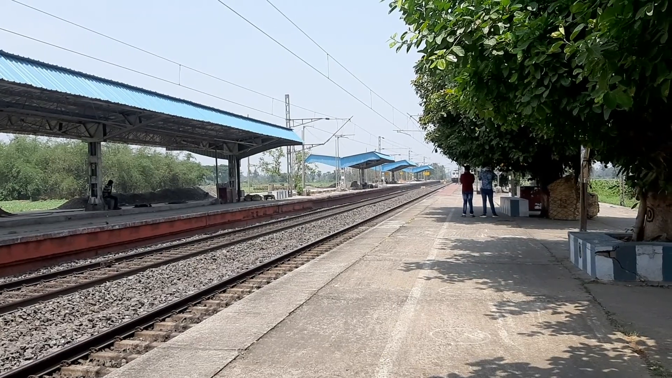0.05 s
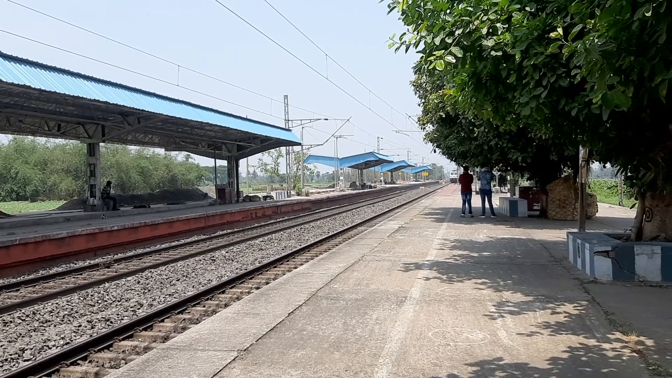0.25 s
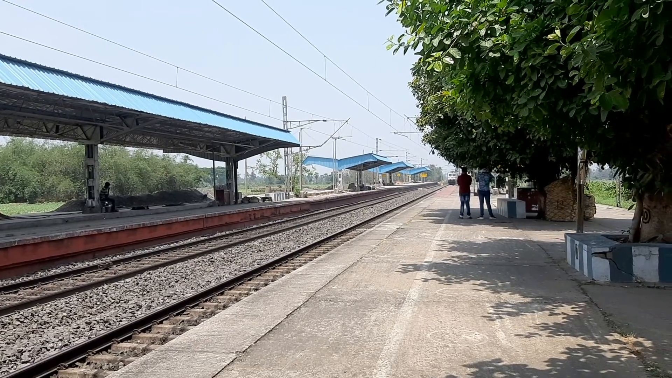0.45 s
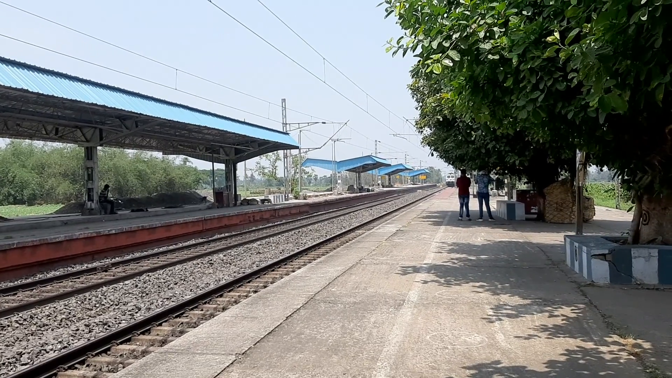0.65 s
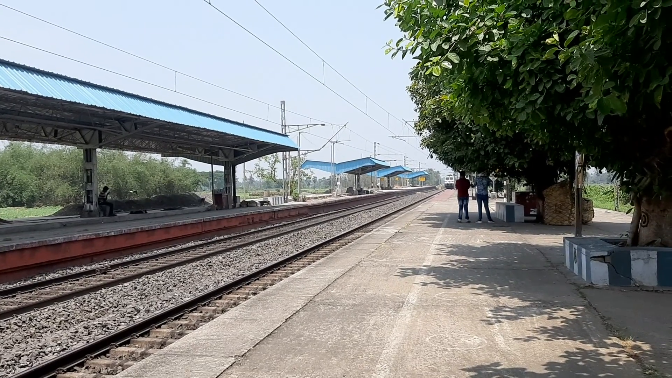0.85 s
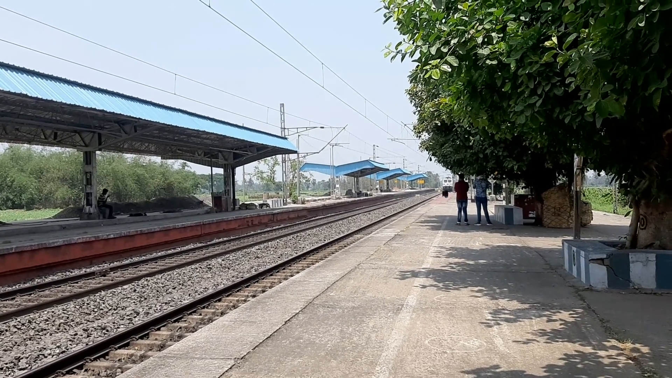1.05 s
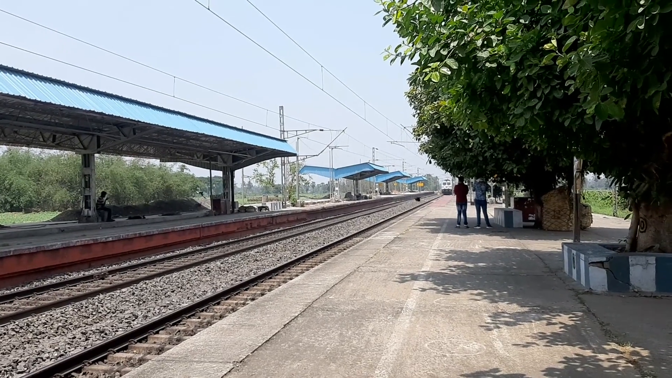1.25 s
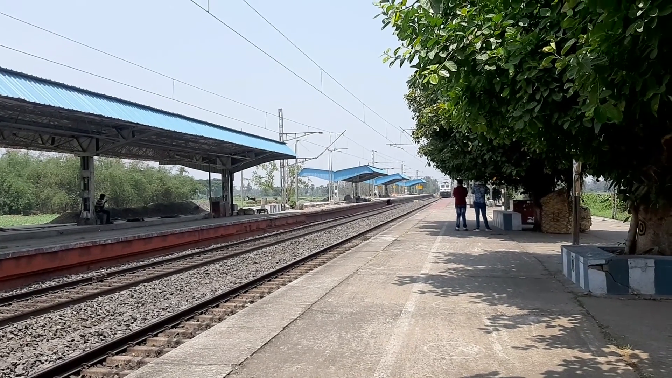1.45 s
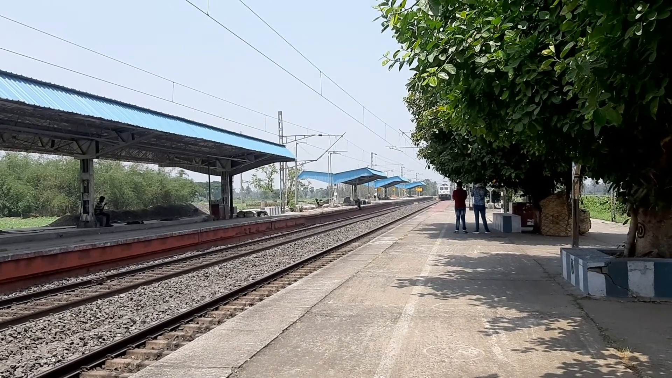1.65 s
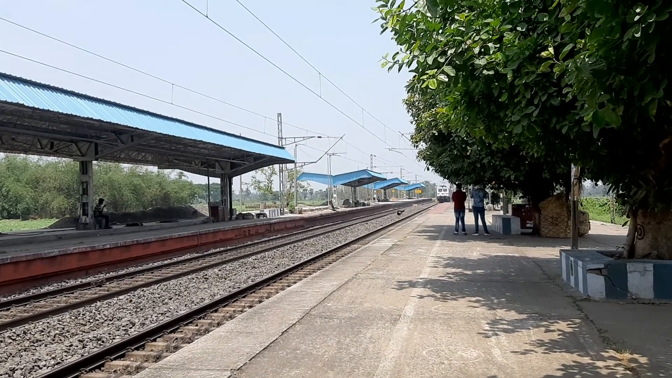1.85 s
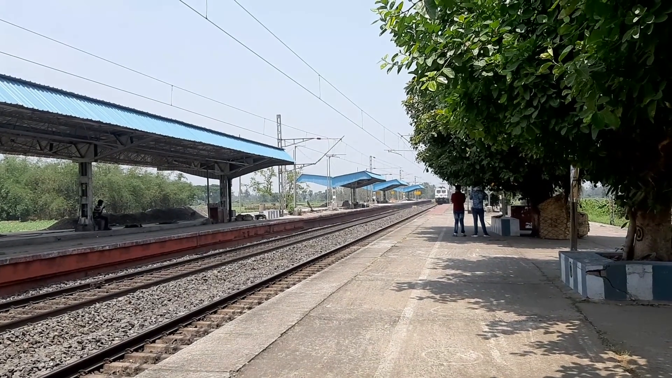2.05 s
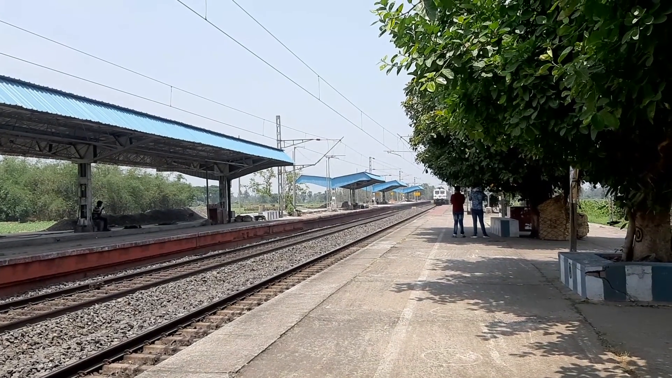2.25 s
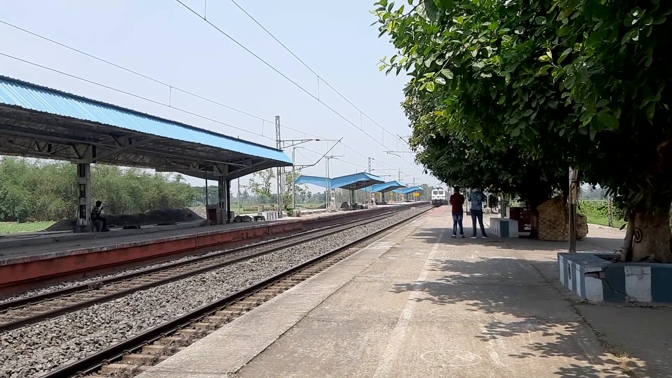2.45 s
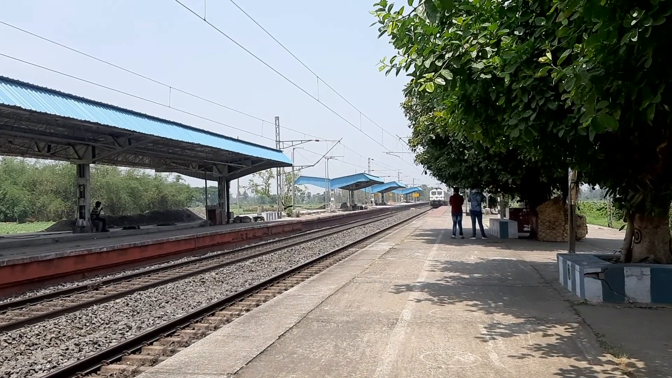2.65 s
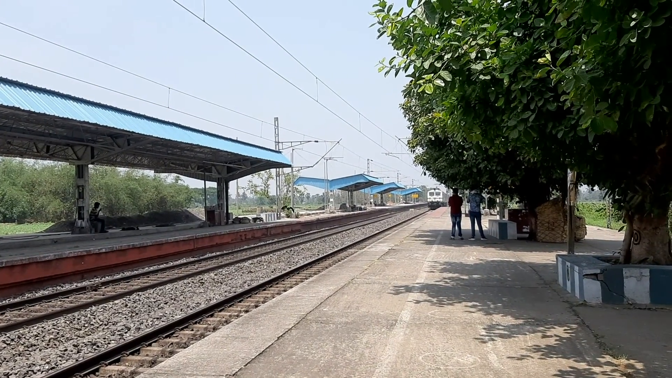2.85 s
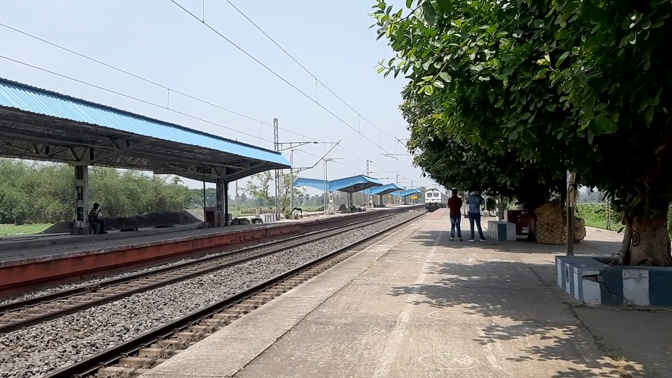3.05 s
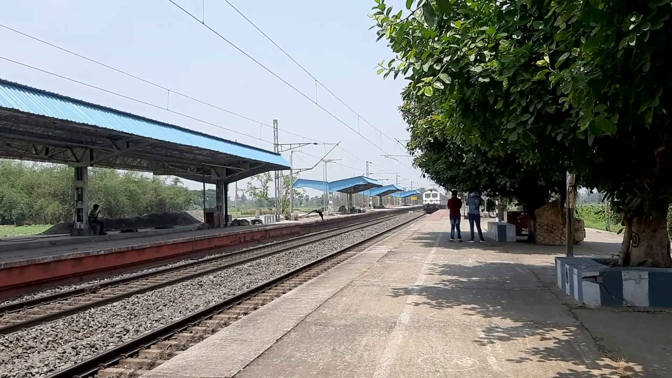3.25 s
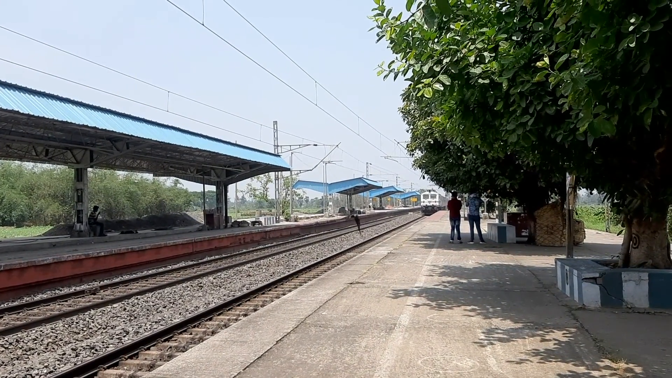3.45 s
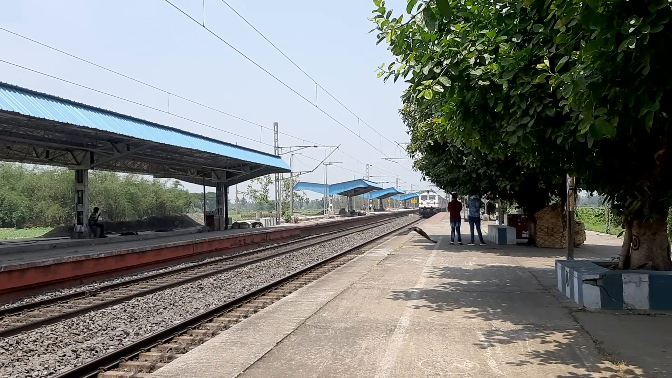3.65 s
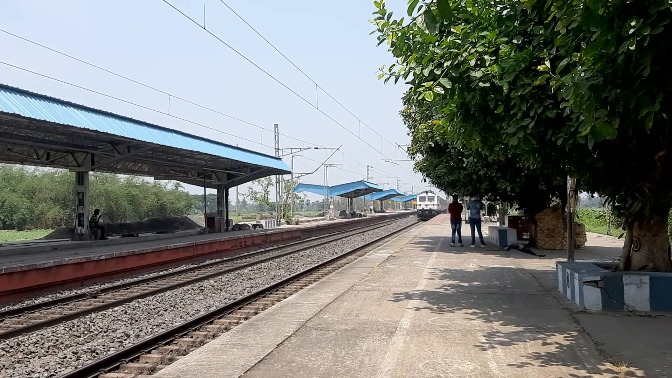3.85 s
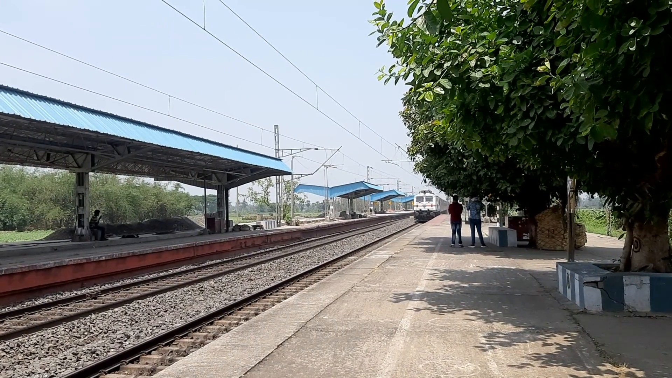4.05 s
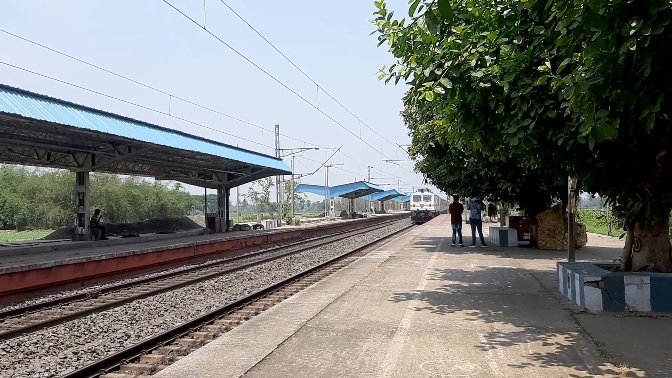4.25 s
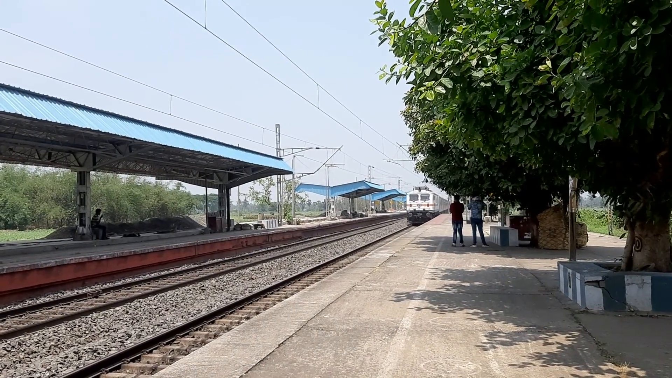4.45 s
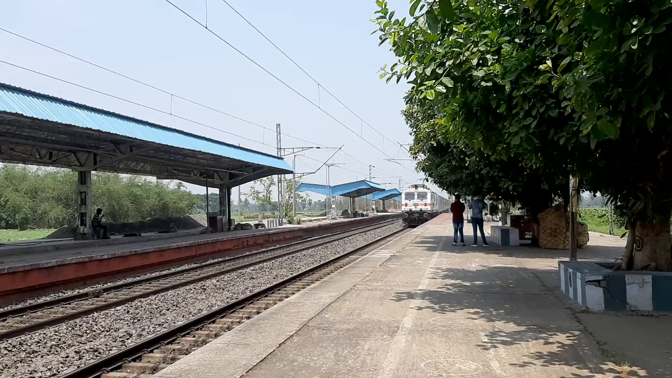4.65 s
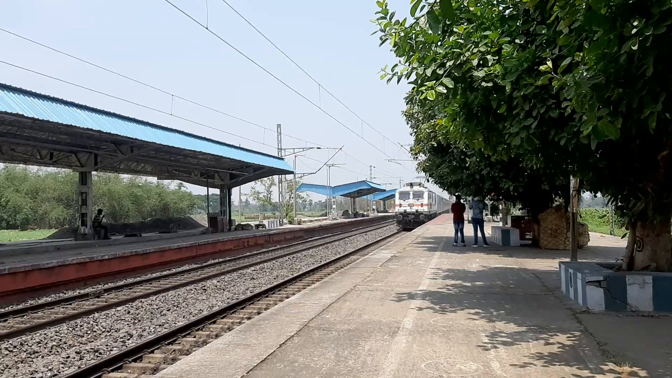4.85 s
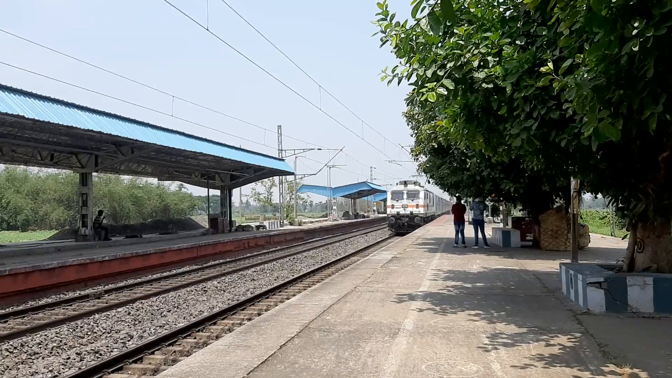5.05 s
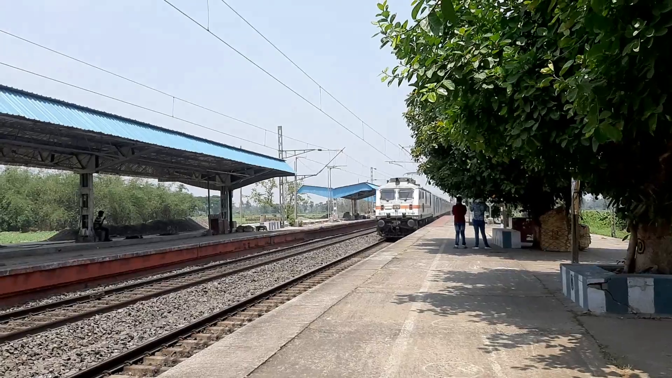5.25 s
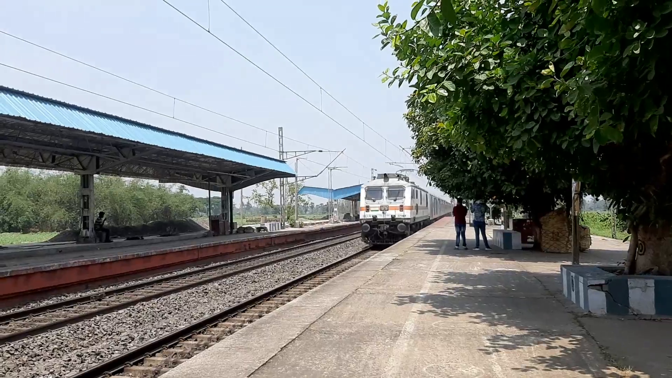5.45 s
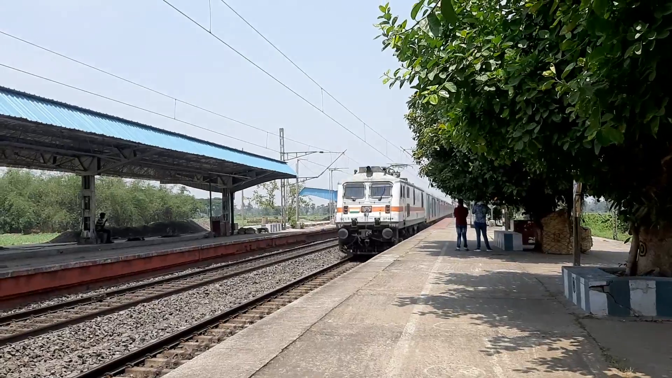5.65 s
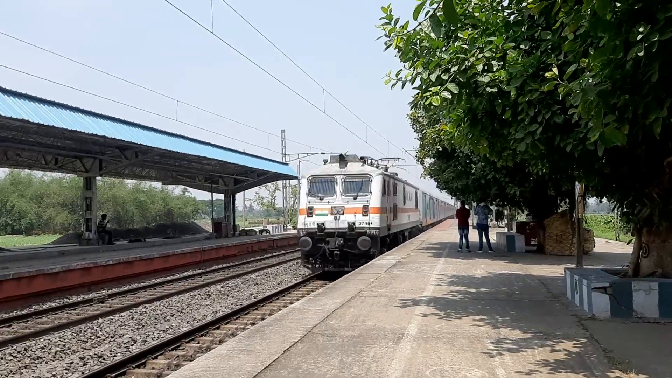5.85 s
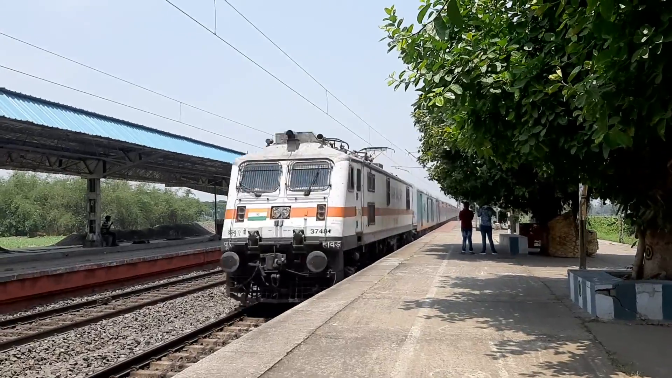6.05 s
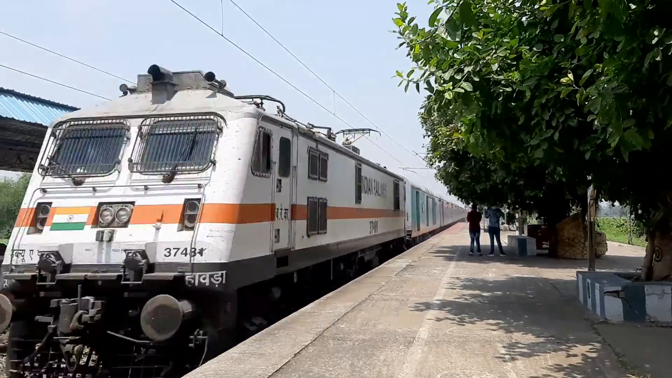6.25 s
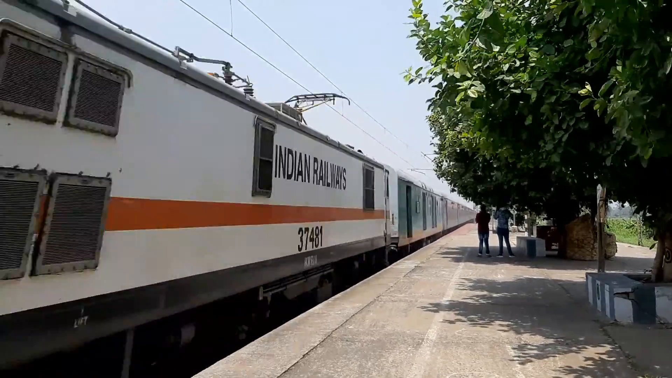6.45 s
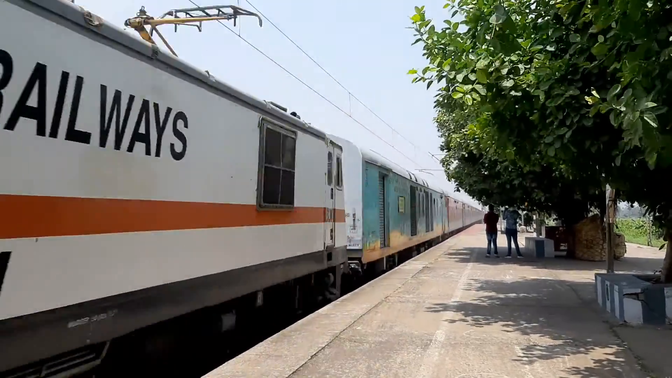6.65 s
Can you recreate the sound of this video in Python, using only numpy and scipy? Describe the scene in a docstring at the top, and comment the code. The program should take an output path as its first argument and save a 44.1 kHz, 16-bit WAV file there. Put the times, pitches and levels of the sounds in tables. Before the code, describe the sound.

An open-air country platform, stereo microphone close to the track. From 0 to about 0.75 s a far locomotive horn, already sounding, wavers softly at a pitch near 355 Hz with strong brassy overtones. It lets go; a hazy echo tail, faint breeze, thin high chirps and a few tiny dry clicks around 1.15 s fill the pause. At 1.35 s a second, louder blast begins, fading and shimmering irregularly, with a brief dip in the surrounding noise near 2.8 s, and ends around 3.8 s. Echoes ring away, with faint chirps near 4.7 s. At 4.8 s the third blast bursts in, bright, raspy and growing very loud. Wheel roar and rumble swell from about 5.5 s, jolting unevenly. Around 6.4 to 6.7 s the engine sweeps past, the horn sliding sharply down in pitch and losing brightness, with brief motor whines amid the roar; it cuts off still sounding.

```python
"""One air horn on an express locomotive sounds three blasts, the first already under way, as it nears a country
platform. Its harmonics interfere over many air paths, so the tone fades and swells; Doppler shift lowers the pitch
as the engine sweeps past. Masts throw back delayed, lower-pitched echoes, and the station answers with a tail.
Comb-filtered noise adds grain round the harmonics; filtered noise makes wheel roar, rumble and breeze;
narrow-band swells make motor whines and faint chirps, and noise bursts a few clicks in the first pause."""
import sys
import numpy as np
from scipy import signal
from scipy.fft import rfft, irfft, next_fast_len
from scipy.io import wavfile
from scipy.ndimage import uniform_filter1d, minimum_filter1d, map_coordinates

SR = 44100
rng = np.random.default_rng(int(sys.argv[2]) if len(sys.argv) > 2 else 0)


def unload_wav(signal):
    """Save mono or channel-first audio to the path in sys.argv[1] as 16-bit WAV at rate SR, clipped to [-1, 1]."""
    wavfile.write(
        sys.argv[1],
        SR,
        np.round(np.clip(np.atleast_2d(signal).T, -1, 1) * 32767).astype(np.int16),
    )


N = 295911

# the horn's blasts, from valve opening to half shut again, with the strength of their side paths before
# distance and pitch alter it: opens_s, half_shut_s, slow_fading_db, fast_shimmer_db
BLASTS = [(-.5, .755, 3.5, -5), (1.35, 3.775, -1, -8), (4.795, 7.5, 0, -7)]
SOUND_SPEED = 343  # m/s
HORN_HZ = 321.38  # at full pressure, standing still
# train speed (m/s), the moment it draws level (s) and the horn's distance then (m)
SPEED, PASSING, TRACK_M = 33, 6.605, 4.2


def horn(dispersion=.085, low_fading=0.2, low_shimmer=0.33, shimmer_rate=45, trim_db=0.84, size=64):
    """Harmonic synthesis and multipath interference: each harmonic fades on its own way through the air."""
    # the low partials, each shaded by the ground in its own way; per blast: time_s, first_db, second_db, third_db
    tone = [
        [(0.03, -32, -34.5, -28), (0.22, -29.5, -37, -23.5), (0.478, -31.5, -30, -43.5), (0.6, -36, -30, -36)],
        [(1.44, -34.5, -26.5, -19.5), (1.55, -38.5, -24, -16), (1.87, -31, -32.5, -16), (1.92, -30, -25.5, -19),
         (2.23, -31.5, -19.5, -15), (2.58, -30, -22.5, -17.5), (2.77, -31, -28.5, -27),
         (2.98, -29.5, -20.5, -18), (3.17, -28, -21.5, -18.5), (3.52, -26.5, -17, -31),
         (3.72, -24.5, -19.5, -24.5)],
        [(4.86, -12, -9.5, -14.5), (4.954, -19, -17.5, -16), (5.072, -19.5, -19, -20),
         (5.276, -21, -20.5, -18.5), (5.302, -19, -19, -31), (5.354, -20, -24.5, -14.5),
         (5.424, -21.5, -17.5, -42), (5.532, -19.5, -24, -20), (5.572, -20.5, -22, -30),
         (5.828, -21, -28.5, -13), (6.146, -23, -12.5, -17.5), (6.28, -21.5, -15.5, -13),
         (6.31, -22, -38, -6.5), (6.366, -8, -7.5, -16), (6.42, -10.5, -11.5, -10)],
    ]
    # the overtones; per blast: time_s, body_db, blare_db, bite_db, sizzle_db
    brass = [
        [(0.03, -33.5, -25.5, -32.5, -52.5), (0.386, -27.5, -33, -35, -64), (0.448, -27, -23.5, -30, -64),
         (0.58, -33, -35, -38, -66)],
        [(1.46, -31.5, -31, -31.5, -45.5), (1.83, -21, -16.5, -31, -46), (2.1, -27, -14, -29, -42.5),
         (2.37, -20.5, -21, -21.5, -44.5), (2.6, -25.5, -14.5, -28, -47.5), (2.73, -28.5, -18.5, -18.5, -34.5),
         (2.95, -25, -15, -21.5, -38.5), (3.15, -21, -23.5, -30, -45), (3.62, -25.5, -23.5, -26.5, -46.5)],
        [(4.92, -28, -16.5, -24, -34.5), (5.184, -19, -14, -22, -32.5), (5.28, -15.5, -17, -21, -35),
         (6.004, -21.5, -18, -22, -28), (6.062, -14, -14, -22, -30), (6.212, -18, -19, -20, -28.5),
         (6.31, -14, -20, -34, -32), (6.38, -11, -16, -41, -32)],
    ]
    # harmonics that share a level curve lie between these counts: harmonic_count
    registers = [0, 1, 2, 3, 7, 12, 22, 44]
    # the horn's own spectrum: multiple, level_db
    overtones = [(1, -11), (2, -4), (3, 0), (4, -10.5), (5, -6), (6, -10), (7, -11), (8, -3), (9, -3.7),
                 (10, -8), (11, -8.5), (12, -9), (13, -14), (14, -11), (15, -13.5), (16, -15.5), (17, -9),
                 (18, -16), (19, -13.5), (20, -11), (21, -20), (22, -29), (25, -26), (27, -28), (30, -21),
                 (33, -23), (38, -24), (44, -26)]
    # how unlike the side paths are in the two channels: frequency_hz, unlikeness
    apart = [(350, .22), (700, .14), (1000, .25), (3000, .47), (7000, .85), (12000, 1.2)]
    absorption = .08  # dB a metre at 10 kHz
    fade_rate, near_fade_rate = 8, 12.07  # fades a second: far away, and added at 10 m
    wake_m = 41  # turbulence round the train adds shimmer within this distance
    lead_s, swing_s = 3.5e-5, 6e-4  # right channel's lead far off, and how much it loses once alongside

    t = clock()
    slow = t[::size]
    distance, angle = approach(slow)
    cycle = np.exp(2j * np.pi * np.cumsum(horn_pitch(t)) / SR).astype(np.complex64)
    fade, shimmer = (amp(per_blast(db, slow)) for db in np.transpose(BLASTS)[2:])
    shimmer = shimmer * np.hypot(1, wake_m / distance)
    # fading quickens near by, where the angles change faster
    progress = np.cumsum(fade_rate + near_fade_rate * 10 / distance) * size / SR
    lead = lead_s - swing_s * np.sin(np.minimum(angle, np.pi / 2)) ** 2
    level_db = per_blast([curves(low, slow) + curves(high, slow) for low, high in zip(tone, brass)], slow)
    levels = amp(trim_db + level_db)

    multiples = np.arange(registers[-1]) + 1
    partial_hz = multiples * HORN_HZ / (1 - SPEED / SOUND_SPEED)
    # air swallows the top of a distant horn
    loss_db = absorption * np.outer((partial_hz / 10000) ** 2, distance)
    shape = amp(np.interp(multiples, *np.transpose(overtones))[:, None] - loss_db)
    ports = np.array([[-1], [1]])  # left, right

    def side_path(pace, share, hz):
        common = share * wander(pace)
        return common + along(apart, hz) * ports * wander(pace)

    out = np.zeros((2, N))
    wave = np.ones(N, np.complex64)
    for lo, hi, level in zip(registers, registers[1:], levels):
        # long waves are hardly disturbed by the air, short ones twinkle
        fades, shimmers = (low_fading, low_shimmer) if hi - lo == 1 else (1, 1)
        path_power = 1 + (fade * fades) ** 2 + (shimmer * shimmers) ** 2
        total = np.linalg.norm(shape[lo:hi], axis=0) * np.sqrt(path_power / 2)
        for k in range(lo, hi):
            wave = wave * cycle
            slow_path = side_path(progress, fades, partial_hz[k])
            fast_path = side_path(slow * shimmer_rate, shimmers, partial_hz[k])
            paths = 1 + fade * slow_path + shimmer * fast_path
            # the flare smears each puff, and one channel hears it first
            phase = dispersion * k * k + np.pi * partial_hz[k] * lead * ports
            strength = level * voicing(slow, k + 1) * shape[k] / total
            for ear, gain in zip(out, strength * paths * np.exp(1j * phase)):
                ear += (np.interp(t, slow, gain) * wave).real
    return out


def approach(t):
    """Straight-line kinematics: the horn's distance (m) and its angle off the line (radians)."""
    ahead = SPEED * (PASSING - t)
    return np.hypot(ahead, TRACK_M), np.arctan2(TRACK_M, ahead)


def pressure(t):
    """Exponential charging and logistic release: air pressure 0-1 builds as the valve opens, ebbs as it shuts."""
    attack_s, release_s = .04, .072  # time constants
    rise = lambda start: (1 - np.exp(-np.abs(t - start) / attack_s)) ** 2
    ebb = lambda end: 1 + np.exp((t - end) / release_s)
    return per_blast([rise(start) / ebb(end) for start, end, *_ in BLASTS], t)


def horn_pitch(t):
    """Doppler shift of a moving source, whose own pitch (Hz) is sharp at low pressure."""
    sharp = .033  # share by which the pitch rises at no pressure
    own_hz = HORN_HZ * (1 + sharp * (1 - pressure(t)))
    return own_hz / (1 - SPEED / SOUND_SPEED * np.cos(approach(t)[1]))


def voicing(t, order):
    """Nonlinear brassiness and directivity: higher harmonics need more pressure and are beamed further ahead."""
    full_voice = 0.85  # share of the pressure that gives full voice
    brassy, brassy_slope = 0.63, 0.44  # harmonic k grows as pressure ** (brassy * k ** brassy_slope)
    # beyond beam_deg off the axis, harmonic k loses off_beam_db * k ** beam_slope a degree
    beam_deg, off_beam_db, beam_slope = 33.5, 0.16, 0.59
    drive = np.minimum(pressure(t) / full_voice, 1)
    off_beam = np.maximum(np.degrees(approach(t)[1]) - beam_deg, 0)
    return drive ** (brassy * order ** brassy_slope) * amp(-off_beam_db * order ** beam_slope * off_beam)


def undertone(level_db=-41.5):
    """Period doubling: every second beat of the diaphragm is slightly stronger, adding the octave below."""
    t = clock()
    wave = np.cos(np.pi * np.cumsum(horn_pitch(t)) / SR)
    return amp(level_db) * 10 / np.hypot(approach(t)[0], 10) * voicing(t, order=2) * wave


def horn_grain(pulsing=0.071, count=12):
    """Comb-filtered noise: grainy rasp and hiss, pulsing once a cycle, gather round the horn's harmonics."""
    # colour of the rasp: frequency_hz, density_db_per_hz
    rasp_colour = [(400, -16), (1000, 6.5), (2000, 1), (3300, 1), (5000, 2), (7000, -8), (8000, -9),
                   (12000, -56)]
    # colour of the hiss: frequency_hz, density_db_per_hz
    hiss_colour = [(5000, -33), (8500, -11), (10500, 0), (12500, 2.5), (14000, 3), (16000, -24)]
    # levels before spreading, flicker and voicing (dB), and the hiss's loss with distance (dB a metre)
    rasp_db, hiss_db, hiss_loss_db = -11, -20.5, 0.3
    kept = .86  # amplitude left at each repeat
    t = clock()
    distance, pitch = approach(t)[0], horn_pitch(t)
    period = np.round(SR / pitch).astype(int)

    def comb(x):
        return unit(sum(kept ** repeat * x[:, np.arange(N) - repeat * period] for repeat in range(count)))

    pulse = unit(1 + pulsing * np.cos(2 * np.pi * np.cumsum(pitch) / SR))
    flicker = wander(t * 16).real
    rasp = amp(rasp_db + 2.5 * flicker) * voicing(t, order=12) * comb(rush(rasp_colour))
    hiss_gain = amp(hiss_db - hiss_loss_db * distance + 1.1 * flicker)
    hiss = hiss_gain * voicing(t, order=32) * comb(rush(hiss_colour))
    return pulse * 10 / np.hypot(distance, 10) * (rasp + hiss)


def mast_echoes(x, glint_db=4):
    """Reflection with growing delay: each mast answers loudest at passing; its echo flickers and slides down."""
    # masts and pillars along the line, level before the flicker: passing_s, offset_from_track_m, echo_db
    masts = [(.1, 7, -34), (1.8, 9, -39), (3.15, 5, -35), (3.55, 6, -31), (5.3, 8, -30), (5.9, 6, -29),
             (6.15, 4, -24)]
    colour = [(300, -34), (700, -6), (1000, 14.5), (2000, -17.5), (5000, 19), (10000, -24)]  # (Hz, dB)
    t = clock()
    engine = SPEED * (PASSING - t)  # metres still to go
    coloured = filtered(x.mean(0), lambda hz: amp(along(colour, hz)))
    out = np.zeros((2, N))
    for s, offset, db in masts:
        place = SPEED * (PASSING - s)
        leg = np.hypot(engine - place, offset)
        # detour by the mast, beyond the direct way
        delay = (leg + np.hypot(place, offset) - np.abs(engine)) / SOUND_SPEED
        glint = np.array([np.interp(t, t[::256], wander(t[::256] * 30).real) for ear in out])
        out += amp(db + glint_db * glint) * offset / leg * np.interp(t - delay, t, coloured, left=0)
    return out


def station(x):
    """Diffuse reverberation: canopies and trees answer with a long tail that dies soonest in the treble."""
    # reverberation time: frequency_hz, t60_s
    reverberation = [(300, 5.2), (1000, 5.9), (3000, 4.2), (10000, 0.051)]
    # strength of the answer: frequency_hz, level_db
    wet = [(350, -18), (700, -26), (1100, -25), (1500, -30), (3000, -30)]
    hz, t, z = signal.stft(rng.standard_normal((2, SR)), SR, nperseg=256)
    decay = amp(-60 * t / along(reverberation, hz)[:, None])
    tail = signal.istft(z * decay, SR, nperseg=256)[1]
    answer = signal.fftconvolve(x.mean(0)[None], tail / np.linalg.norm(tail[0]), axes=1)[:, :N]
    return filtered(answer, lambda hz: amp(along(wet, hz)))


def lingering_partials():
    """Narrow-band swells: single partials linger faintly after the blasts end."""
    # level before random blur: centre_s, half_length_s, pitch_hz, level_db
    lingering = [(.8, .08, 1070, -33), (1.04, 0.11, 355, -35), (4.32, 0.096, 353.6, -40)]
    return swells(lingering, width=0.0301)


def train(jolt_db=3.2):
    """Rolling noise of a spread source: rumble and wheel roar grow on nearing, shaken by the uneven track."""
    # colour of the rumble: frequency_hz, density_db_per_hz
    bass_colour = [(15, -40), (30, -10), (45, -11), (70, -0.5), (120, 0), (230, 0), (350, -46), (700, -21)]
    # colour of the wheel roar: frequency_hz, density_db_per_hz
    wheel_colour = [(30, -44), (90, -11), (200, -9), (300, 6.5), (500, -3.5), (800, 6.5), (1100, -2.5),
                    (1400, -11), (2300, -7), (4000, -10), (7000, -18), (8500, -50), (12000, -37),
                    (16000, -51)]
    # levels before the shaking (dB): steady background; the train's rumble and roar at 10 m, spread included
    far_rumble_db, rumble_db, roll_db = -57.5, -34.5, -19.5
    # fall for ten times the distance (dB), and the lengths over which rumble and wheels spread (m)
    roll_fall_db, body_m, wheels_m = 24, 16, 10.1
    t = clock()
    fall_db = lambda spread: roll_fall_db * np.log10(np.hypot(approach(t)[0], spread) / 10)
    low = np.hypot(amp(far_rumble_db), amp(rumble_db - fall_db(body_m)))
    rumble = low * amp(2.5 * wander(t * 14).real) * rush(bass_colour)
    jolts = jolt_db * wander(t * 22).real
    return rumble + amp(roll_db - fall_db(wheels_m) + jolts) * rush(wheel_colour)


def motor_whines():
    """Narrow-band tonal radiation: traction motors whine close by."""
    # level before random blur: centre_s, half_length_s, pitch_hz, level_db
    whines = [(6.48, 0.0703, 830, -26), (6.68, .05, 2216, -23)]
    return swells(whines, width=0.07)


def chirps():
    """Brief narrow-band tones: thin high chirps under Gaussian envelopes."""
    # level before random blur: centre_s, half_length_s, pitch_hz, level_db
    chirp_rows = [(.805, 0.0068, 5000, -36), (.88, .0057, 4970, -39.5), (.937, .0042, 5000, -37),
                  (1.005, 0.0065, 6100, -40), (1.298, .0055, 6900, -41), (4.66, 0.016, 5540, -37),
                  (4.66, .012, 7000, -41), (4.715, 0.018, 5470, -33.5), (4.715, 0.021, 7000, -37)]
    return swells(chirp_rows, width=0.15)


def clicks(decay=0.0036, click_db=-14):
    """Exponentially damped impulses: a few small dry clicks in the first pause, made of short noise bursts."""
    # onsets, with levels relative to click_db: start_s, level_db
    onsets = [(1.134, -15.5), (1.137, -16.5), (1.141, -28), (1.145, -16.5), (1.181, -17.5)]
    # colour of the clicks: frequency_hz, density_db_per_hz
    click_colour = [(60, -17), (300, 4), (1000, -2), (4500, -6.5), (8500, -19), (13000, -16), (16000, -23)]
    t = clock()
    bursts = sum(amp(db + click_db) * (t >= s) * np.exp(-np.abs(t - s) / decay) for s, db in onsets)
    return bursts * rush(click_colour)


def breeze():
    """Stationary broadband noise: leaves and open air."""
    # colour of the breeze: frequency_hz, density_db_per_hz
    breeze_colour = [(200, -17), (1000, 6), (3000, 0.5), (7000, -5), (8500, -21), (11000, -4.5),
                     (12500, -9), (15000, -29)]
    return amp(-43.0) * rush(breeze_colour)


def lull(t):
    """Amplitude modulation by a flat-topped bell: the gain of one brief dip."""
    centre_s, half_length_s, depth_db = 2.825, 0.11, -7
    return amp(depth_db * np.exp(-((t - centre_s) / half_length_s) ** 4))


def swells(rows, width):
    """Random modulation of a tone: width is the bandwidth as a share of the pitch, the envelope Gaussian."""
    t, out = clock(), np.zeros((2, N))
    for s, length, hz, db in rows:
        near = np.abs(t - s) < 3 * length
        u = t[near] - s
        blur = np.array([wander((u + 3 * length) * hz * width) for ear in out])
        tone = (blur * np.exp(2j * np.pi * hz * u)).real
        out[:, near] += amp(db) * np.sqrt(2) * np.exp(-(u / length) ** 2) * tone
    return out


def rush(spectrum):
    """Interchannel coherence: coloured stereo noise of rms 1, its likeness set by mixing mid and side."""
    # left-right likeness of noise: frequency_hz, correlation
    likeness = [(50, 0.33), (150, 0.85), (300, 1), (700, 0.44), (2000, 0.12), (8000, 0.37)]

    def response(hz):
        turn = np.arccos(np.clip(along(likeness, hz), -1, 1)) / 2
        return amp(along(spectrum, hz)) * [np.cos(turn), np.sin(turn)]

    mid, side = filtered(rng.standard_normal((2, N)), response)
    return unit(np.array([mid + side, mid - side]))


def wander(progress, size=1200):
    """Band-limited random process: a smooth complex gain, one new value per unit of progress."""
    re, im = (map_coordinates(k, [progress], mode="mirror") for k in rng.standard_normal((2, size)))
    return (re + 1j * im) / np.sqrt(2)


def filtered(x, response):
    """Linear filtering by spectral multiplication: x times a response of frequency."""
    m = next_fast_len(N + SR // 4)
    return irfft(rfft(x, m) * response(np.fft.rfftfreq(m, 1 / SR)), m)[..., :N]


def per_blast(values, t):
    """Piecewise selection: at each time, the value that belongs to the latest blast."""
    return np.choose(sum((t >= row[0]).astype(int) for row in BLASTS[1:]), values)


def curves(rows, t):
    """Linear interpolation: each column after the first, read at the times t."""
    s, *cols = np.transpose(rows)
    return [np.interp(t, s, c) for c in cols]


def along(points, hz):
    """Logarithmic interpolation: (Hz, value) points on a log frequency axis."""
    f, v = np.transpose(points)
    return np.interp(np.log(hz + 1), np.log(f + 1), v)


def amp(db):
    """Logarithmic level: decibels to gain."""
    return 10 ** (np.asarray(db) / 20)


def unit(x):
    """Power normalization: scale to rms 1."""
    return x / np.sqrt(np.mean(np.abs(x) ** 2) + 1e-20)


def clock():
    """Uniform sampling: the time of every sample (s)."""
    return np.arange(N) / SR


def scene():
    """Linear superposition of horn, echoes, train and platform; mast echoes and all noise but the clicks dip once."""
    blast = horn()
    tail = station(blast) + lingering_partials()
    noise = mast_echoes(blast) + horn_grain() + train() + breeze()
    small = motor_whines() + chirps() + clicks()
    return blast + undertone() + tail + lull(clock()) * noise + small


def record(dry, size=220):
    """Peak limiting and band limiting: the channels differ in colour, peaks are held down, the top ends steeply."""
    # colour difference of the channels: frequency_hz, left_minus_right_db
    lean = [(100, 0.5), (380, 0), (700, 0), (1200, 0), (2400, -2), (4400, -1.9), (8000, 1), (14000, 2)]
    top_hz = 15850
    x = filtered(dry, lambda hz: amp(along(lean, hz) * np.array([[.5], [-.5]])))
    needed = 1 / np.maximum(np.abs(x), 1)
    x = x * uniform_filter1d(minimum_filter1d(needed, 2 * size), size)
    return filtered(x, lambda hz: hz < top_hz)


dry = scene()
out = record(dry)
unload_wav(out)
```